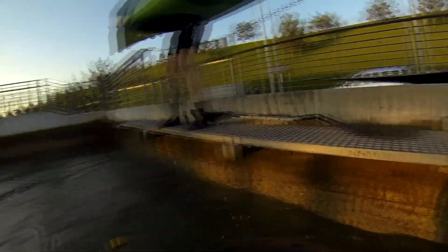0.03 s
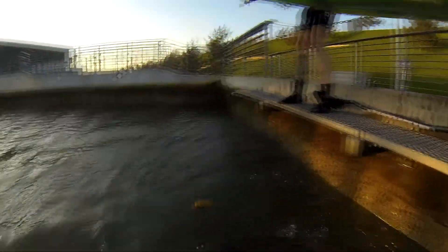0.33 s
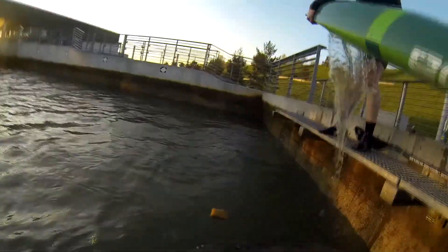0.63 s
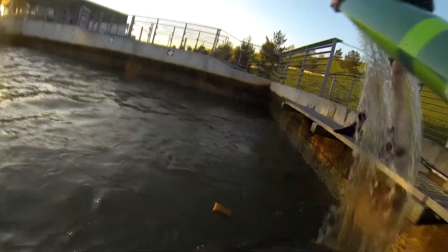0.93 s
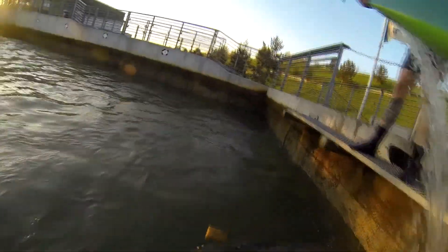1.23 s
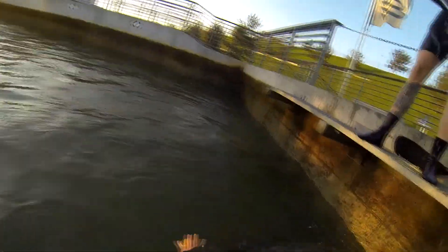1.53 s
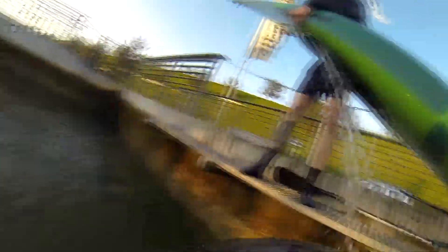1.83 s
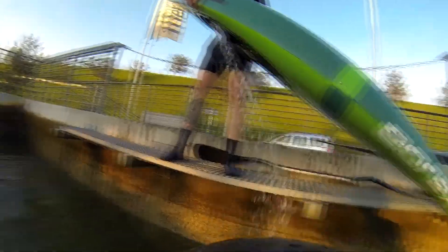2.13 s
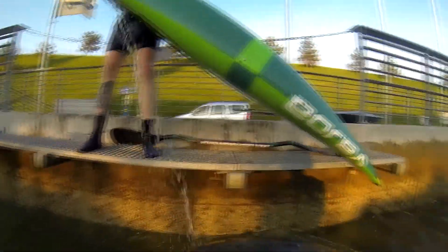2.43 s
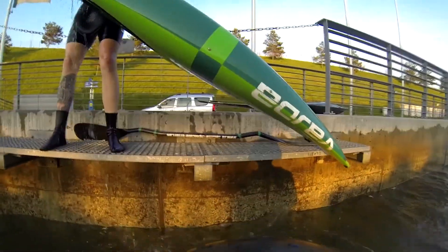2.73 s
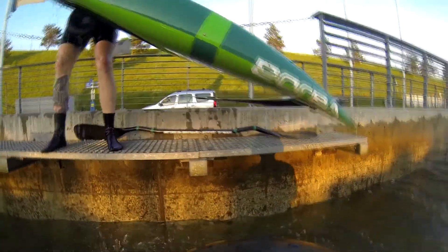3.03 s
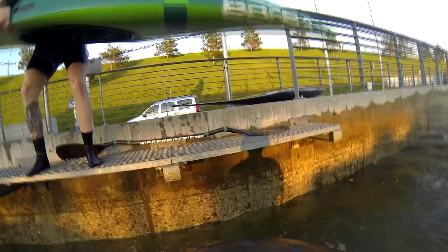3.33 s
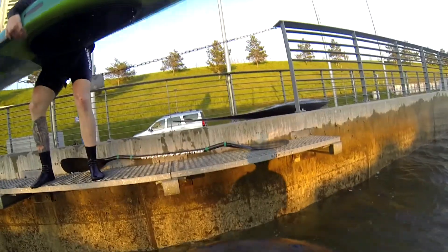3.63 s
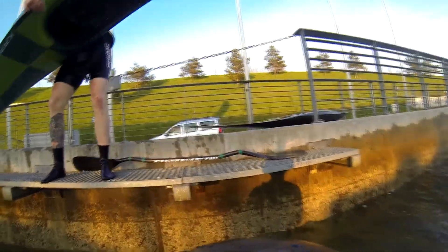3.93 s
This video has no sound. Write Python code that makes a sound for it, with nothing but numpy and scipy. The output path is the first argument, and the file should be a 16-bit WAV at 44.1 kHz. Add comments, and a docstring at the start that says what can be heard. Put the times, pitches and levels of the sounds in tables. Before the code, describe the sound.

Splashing water drains out of a kayak into a concrete basin, then trickles and drips.

```python
"""Over a distant wash and rumble, wind nudges the microphone and a first drip ticks. Near 0.8 s water
gushes from a tipped kayak into a concrete basin: drops strike the surface, and trapped air rings as
bubbles. After 2 s the stream thins to a trickle, then to drips. The water and its short echo are
heard through a waterproof camera case whose resonance honks near 1.5 kHz."""
import sys
import numpy as np
from scipy import signal
from scipy.fft import rfft, irfft
from scipy.io import wavfile
from scipy.ndimage import uniform_filter1d

SR = 44100
rng = np.random.default_rng(int(sys.argv[2]) if len(sys.argv) > 2 else 0)


def to_wav(sig):
    """Store sig (one row per channel, or 1-D mono) as 16-bit WAV at the path in sys.argv[1].

    Samples outside -1..1 are clipped; the rate is SR.
    """
    pcm = np.clip(np.atleast_2d(sig), -1, 1) * 32767
    pcm = np.round(pcm).astype(np.int16)
    wavfile.write(sys.argv[1], SR, pcm.T)  # frames by channels


N = 176400
T = np.arange(N) / SR

# Distant wash of the basin. Each row: frequency in Hz, relative spectral density in dB.
WASH_SPECTRUM = [(88, -25), (150, -6), (270, -8.5), (556, -11), (1080, -16), (1260, -4.5), (1490, -1),
                 (1870, -18.5), (2220, -19.5), (3500, -21.5), (5850, -31), (14000, -33.5)]
# Narrow resonances of the case in the wash. Each row: centre in Hz, width in Hz, level in dB.
CASE_MODES = [(5080, 440, -82.5), (1534, 156, -66.5)]
# Far rumble. Each row: frequency in Hz, relative spectral density in dB.
RUMBLE_SPECTRUM = [(40, -3), (70, -2), (98, -6), (118, 3.5), (140, -6.5), (500, -35.5), (2000, -92)]
# Wind pressure. Each row: frequency in Hz, relative spectral density in dB.
WIND_SPECTRUM = [(3, -20.5), (9, 3), (18, 6.5), (30, -10.5), (48, -12), (65, -22), (90, -28), (150, -39.5),
                 (2000, -120)]
# Wind strength. Each row: time in seconds, level in dB.
GUST_LEVELS = [(.12, -31.5), (.26, -43.5), (.42, -33), (.6, -43.5), (.7, -38), (.9, -46), (1.12, -43),
               (1.25, -28), (1.37, -38), (1.6, -35), (2.18, -40), (2.45, -41.5), (2.75, -43), (2.95, -43),
               (3.2, -37.5), (3.38, -42), (4, -45)]
# Single buffets on the case. Each row: time of the peak in seconds, level in dB, frequency in Hz.
WIND_BUFFETS = [(0.336, -32, 29.4), (1.207, -26.5, 28), (1.275, -22.5, 22), (2, -23, 21),
                (2.136, -20.5, 21.3), (2.347, -32.5, 28.5), (3.17, -32, 21), (3.264, -27, 20)]
# Response of the camera case. Each row: frequency in Hz, gain in dB.
CASE_RESPONSE = [(150, -26), (700, -19.5), (950, -14.5), (1150, -13.5), (1350, -1), (1520, 2.5),
                 (1680, -3.5), (1950, -11), (2200, -8), (2600, -13), (3050, -12.5), (3700, -26.5),
                 (4300, -22), (4800, -21.5), (5250, -20), (5900, -28.5), (6600, -28.5), (7400, -33.5),
                 (8400, -31), (9300, -39.5), (10300, -34.5), (13000, -43), (14000, -32.5)]
# Sharp drips close by. Each row: start in seconds, level in dB, centre of the tick in Hz.
NEAR_DRIPS = [(0.564, -60, 4050), (1.382, -45, 4950), (1.395, -44, 5000), (1.765, -52, 7900),
              (2.171, -54.5, 12000), (2.291, -51.5, 8900), (2.343, -49.5, 4570), (2.657, -56.5, 9050),
              (2.767, -49.5, 5500), (3.236, -55.5, 4670), (3.383, -54.5, 4660), (3.592, -55, 5800),
              (3.623, -59, 4020), (3.667, -48, 5450)]
# Fine spray. Each row: time in seconds, level in dB.
SPRAY_LEVELS = [(.745, -77), (.77, -58), (.79, -61), (.84, -67), (.868, -58.5), (.905, -62.5), (.97, -56),
                (1.06, -71), (1.4, -57), (1.62, -57), (1.9, -69), (2.3, -66), (2.75, -63.5), (2.95, -68),
                (3.3, -69.5), (4, -79)]
# The falling stream. Each row: time in seconds, level in dB.
FLOW_LEVELS = [(.755, -64), (.785, -49), (.83, -57.5), (.875, -50), (.912, -48), (.925, -43.5),
               (.98, -40.5), (1.03, -43), (1.2, -39.5), (1.4, -41), (1.62, -40.5), (1.8, -44.5),
               (2.05, -46.5), (2.4, -51.5), (2.78, -58), (2.95, -62.5), (3.3, -59), (4, -68.5)]
# Single large bubbles, plus one low thud of water on the kayak's deck or hull near 1.9 s. Each row: start in
# seconds, pitch in Hz, level in dB ahead of the case.
PLOPS_AND_THUD = [(.784, 1980, -30), (0.79, 1578, -29.5), (0.849, 1310, -38.5), (1.115, 200, -25),
                  (1.2, 457, -28), (1.905, 117, -21.5), (2.022, 1477, -33.5), (2.03, 1396, -41),
                  (2.247, 1630, -38), (2.295, 780, -32), (2.32, 1556, -39.5), (2.548, 1660, -41),
                  (2.63, 715, -34.5), (2.669, 1640, -39), (2.785, 1533, -39.5), (2.829, 2770, -39),
                  (2.873, 2500, -41.5), (3.169, 1306, -39), (3.203, 1544, -45), (3.237, 2830, -37),
                  (3.242, 2490, -40), (3.441, 1690, -39.5)]
# Low gurgle where the stream plunges in. Each row: time in seconds, level in dB.
PLUNGE_LEVELS = [(.8, -91), (1, -62.5), (1.25, -57.5), (1.5, -61), (1.75, -68), (2.3, -73), (3, -88)]
# Clumps of water hitting the surface. Each row: start in seconds, level in dB, decay in seconds.
CLUMP_SLAPS = [(.873, -45.5, 0.011), (.919, -40.5, 0.011), (.972, -41, 0.019), (1.23, -37, 0.0071),
               (1.344, -38, 0.011), (1.381, -36.5, 0.012), (1.615, -36.5, 0.0067), (2.022, -44, 0.0044),
               (2.29, -44, 0.009)]
# Thin trickle boring into the surface. Each row: time in seconds, level in dB.
TRICKLE_LEVELS = [(2.1, -68), (2.3, -60.5), (2.78, -61), (2.9, -74.5)]
# The trickle's two bubble sizes. Each row: pitch in Hz, relative level in dB.
TRICKLE_SIZES = [(1130, -2.5), (1600, 2.5)]


def amp(db):
    """Amplitude grows tenfold for every 20 dB."""
    return 10 ** (np.asarray(db) / 20)


def unit(x):
    """Division by the rms gives unit power."""
    return x / np.sqrt(np.mean(x ** 2) + 1e-20)


def level(points):
    """An envelope runs straight in decibels between (s, dB) points."""
    return amp(np.interp(T, *np.transpose(points)))


def db_at(points, hz):
    """A spectrum runs straight between (Hz, dB) points on a logarithmic frequency axis."""
    f, db = np.transpose(points)
    return np.interp(np.log(hz + 1), np.log(f + 1), db)


def add(mix, start_s, sound):
    """Superposition: a sound adds to the mix from its start time."""
    part = mix[max(round(start_s * SR), 0):][:len(sound)]
    part += sound[:len(part)]


def noise(response):
    """Filtered white noise takes on the filter's spectrum, given as gain against Hz."""
    return unit(irfft(rfft(rng.standard_normal(N)) * response(np.fft.rfftfreq(N, 1 / SR)), N))


def coloured(points):
    """Spectral shaping gives noise the colour of (Hz, dB) points."""
    return noise(lambda f: amp(db_at(points, f)))


def flutter(rate_hz, depth_db):
    """Random amplitude modulation wavers up to about the given rate."""
    wander = noise(lambda f: (f > rate_hz / 8) / (1 + (f / rate_hz) ** 4))
    return unit(amp(depth_db * wander))


def band(x, hz, span=1.614):
    """A broad resonance passes frequencies within a factor of span of its centre."""
    edges = [hz / span, min(hz * span, SR / 2 - 1)]
    return signal.sosfilt(signal.butter(2, edges, "band", fs=SR, output="sos"), x)


def basin():
    """Broadband excitation: the steady distant wash keeps the case's modes ringing faintly."""
    rings = sum(amp(db) * noise(lambda f: 1 / (1 + (2 * (f - hz) / width) ** 2))
                for hz, width, db in CASE_MODES)
    return amp(-60) * coloured(WASH_SPECTRUM) + rings


def rumble():
    """The far surroundings give stationary noise with its power at low frequencies."""
    return amp(-64.5) * coloured(RUMBLE_SPECTRUM)


def wind(buffet_cycles=0.52):
    """Turbulent pressure on the case swings with the gusts and with a few stronger buffets."""
    pressure = coloured(WIND_SPECTRUM)
    pressure /= np.sqrt(uniform_filter1d(pressure ** 2, size=9000) + 1e-6)  # even out the power
    pressure *= level(GUST_LEVELS) * flutter(rate_hz=8.8, depth_db=2.0)
    lowpass = signal.butter(4, 130, fs=SR, output="sos")
    eddies = amp(-25) * signal.sosfilt(lowpass, coloured(RUMBLE_SPECTRUM))
    for peak_s, db, hz in WIND_BUFFETS:
        turns = (T - peak_s) * hz
        swell = amp(db) * np.exp(-(turns / buffet_cycles) ** 2)
        pressure += swell * (np.cos(2 * np.pi * turns) + eddies)
    return pressure


def case(x, size=4096):
    """The camera case acts as a minimum-phase filter, ringing only after it is excited."""
    log_gain = np.log(amp(db_at(CASE_RESPONSE, abs(np.fft.fftfreq(size, 1 / SR)))))
    ring = np.fft.ifft(np.exp(np.conj(signal.hilbert(log_gain)))).real
    return signal.oaconvolve(x, ring[:size // 2])[:N]


def burst(decay_s, attack_s=.0001):
    """Spatter is a noise transient with a quick rise and an exponential decay."""
    t = np.arange(SR // 5) / SR
    return rng.standard_normal(len(t)) * np.exp(-t / decay_s) * (1 - np.exp(-t / attack_s))


def bubble(hz, cycles, rise=0.021, attack_s=0.00054):
    """Trapped air is a damped oscillator; its pitch climbs by the fraction rise per decay time."""
    decay_s = cycles / hz
    t = np.arange(0, 6 * decay_s, 1 / SR)
    envelope = (1 - np.exp(-t / attack_s)) * np.exp(-t / decay_s)
    return envelope * np.sin(2 * np.pi * hz * (t + rise * t * t / (2 * decay_s)))


def drips(white):
    """Each drip ticks on impact and traps a tiny resonating bubble."""
    mix = np.zeros(N)
    for start, db, hz in NEAR_DRIPS:
        tick = band(burst(decay_s=0.0053, attack_s=0.0017), hz) / case(band(white, hz)).std()
        ring = amp(-1.5 - db_at(CASE_RESPONSE, hz)) * bubble(hz, cycles=17)
        add(mix, start, amp(db) * tick)
        add(mix, start, amp(db) * ring)
    return case(mix)


def walls(x, t60_s=0.12):
    """Scattered reflections from the concrete form a short, exponentially decaying echo."""
    t = np.arange(SR // 2) / SR
    taps = rng.standard_normal(len(t)) * (rng.random(len(t)) < .04)
    taps *= (t > .006) * amp(-60 * t / t60_s)
    return amp(-14) * signal.oaconvolve(x, taps / np.linalg.norm(taps))[:N]


def impacts(peak_per_s, gain, spread_db):
    """Impulses arrive as a Poisson process of even mean power, sparser where the gain is low."""
    share = np.maximum(gain / gain.max(), .1)
    hits = rng.random(N) < peak_per_s * share / SR
    strengths = amp(spread_db * np.minimum(rng.exponential(1, N), 3))
    return hits * strengths * rng.choice([-1, 1], N) / np.sqrt(share)


def spray(peak_per_s=1300, sizes=12):
    """Fine droplets patter on impact, each size in its own treble band."""
    gain = level(SPRAY_LEVELS)
    ticks = np.zeros(N)
    for hz in np.geomspace(4800, 13000, sizes):
        hits = impacts(peak_per_s / sizes, gain, spread_db=4.0)
        ticks += band(signal.oaconvolve(hits, burst(decay_s=0.006))[:N], hz)
    return gain * unit(case(ticks))


def swarm(peak_per_s, gain, low_hz, high_hz, cycles, spread_db, sizes=30):
    """Bubbles form at random, each ringing at the natural frequency of its size."""
    pitches = low_hz * (high_hz / low_hz) ** ((np.arange(sizes) + rng.random(sizes)) / sizes)
    rings = np.zeros(N)
    for hz in pitches:
        births = impacts(peak_per_s / sizes, gain, spread_db)
        rings += signal.oaconvolve(births, bubble(hz, cycles) * hz)[:N]
    return rings


def stream():
    """Drop impacts, bubbles and froth add incoherently, all modulated by the lumpy flow."""
    flow = level(FLOW_LEVELS)
    drops = unit(case(impacts(4200, flow, spread_db=3.5)))
    rings = unit(case(swarm(1400, flow, low_hz=934, high_hz=6220, cycles=8.0, spread_db=3.0)))
    froth = unit(case(rng.standard_normal(N)))
    gush = amp(-6.5) * drops + amp(-6) * rings + amp(-6.5) * froth
    return flow * flutter(rate_hz=68, depth_db=1.0) * gush


def plops(white):
    """Single large bubbles, and one low thud on the hull, resonate amid spatter; the lower ones ring for fewer
    cycles."""
    mix = np.zeros(N)
    for start, hz, db in PLOPS_AND_THUD:
        add(mix, start, amp(db) * bubble(hz, cycles=11.2 * (hz / 1500) ** 0.68))
        spatter = band(burst(decay_s=0.021, attack_s=0.0067), hz) / band(white, hz).std()
        add(mix, start, amp(db - 13) * spatter)
    return case(mix)


def plunge():
    """Large, heavily damped bubbles gurgle at low frequencies under the thick of the stream."""
    gain = level(PLUNGE_LEVELS)
    return gain * unit(swarm(800, gain, low_hz=100.8, high_hz=564, cycles=3.7, spread_db=1.5))


def slaps(white):
    """Clumps of water strike the surface, and each brief impact radiates broadband noise."""
    mix = np.zeros(N)
    for start, db, decay_s in CLUMP_SLAPS:
        add(mix, start, amp(db) * burst(decay_s, attack_s=0.00097))
    return case(mix) / case(white).std()


def trickle(span=1.05):
    """The last thread of water entrains separate bubbles that resonate around two pitches."""
    gain = level(TRICKLE_LEVELS)
    rings = np.zeros(N)
    for hz, db in TRICKLE_SIZES:
        rings += amp(db) * unit(swarm(110, gain, hz / span, hz * span, cycles=13, spread_db=2, sizes=8))
    return gain * rings


def scene():
    """Wash, rumble, wind, water and its echo superpose at one microphone."""
    white = rng.standard_normal(SR // 4)  # reference for the gain that filters give to noise
    water = drips(white) + spray() + stream() + plops(white) + plunge() + slaps(white) + trickle()
    return (basin() + rumble() + wind() + water + walls(water))[None]


def record(dry, edge_hz=14150):
    """A steep low-pass filter limits the bandwidth."""
    lowpass = signal.firwin(511, edge_hz, window=("kaiser", 9), fs=SR)
    return signal.oaconvolve(dry, lowpass[None], "same")


dry = scene()
out = record(dry)
to_wav(out)
```